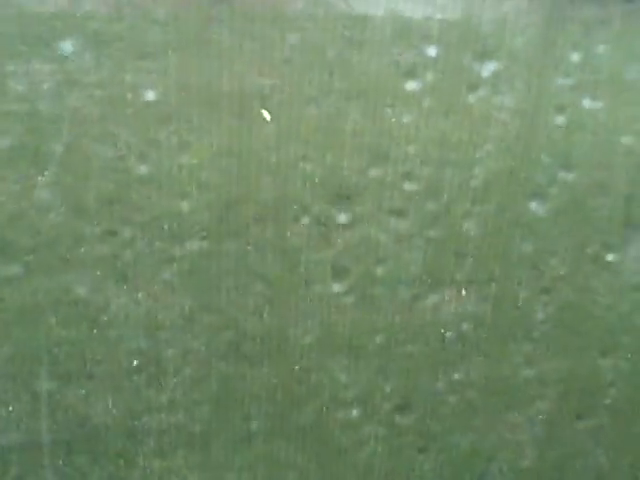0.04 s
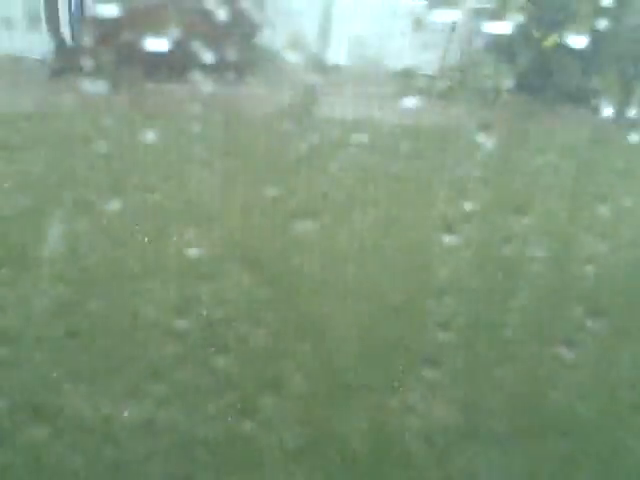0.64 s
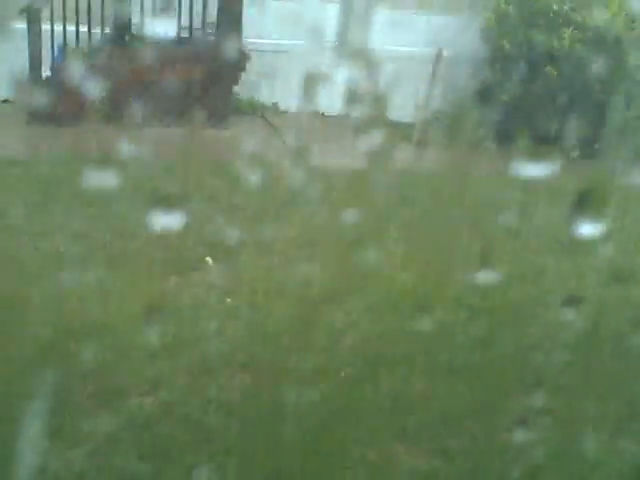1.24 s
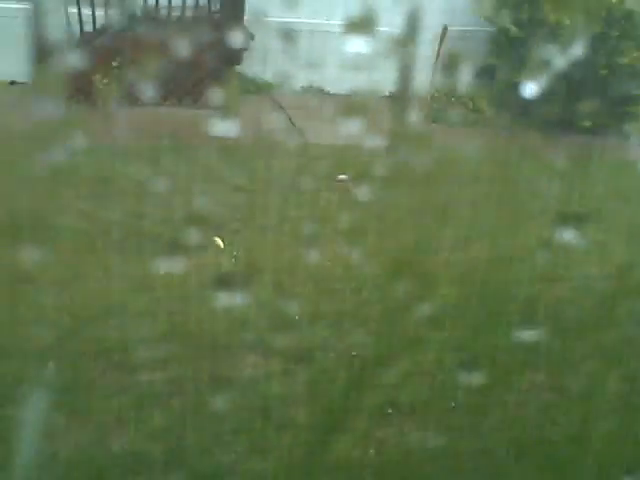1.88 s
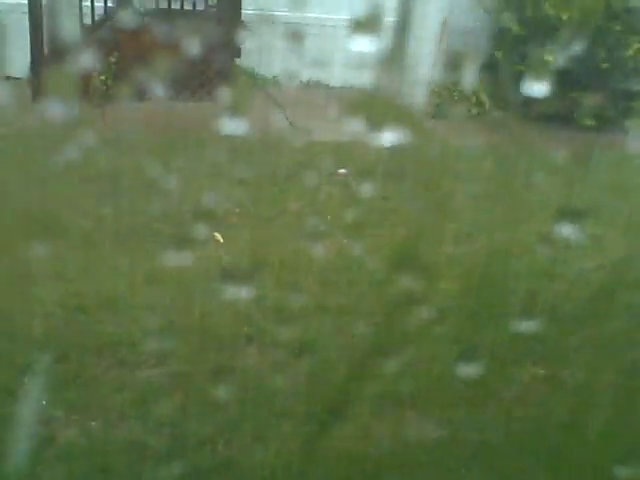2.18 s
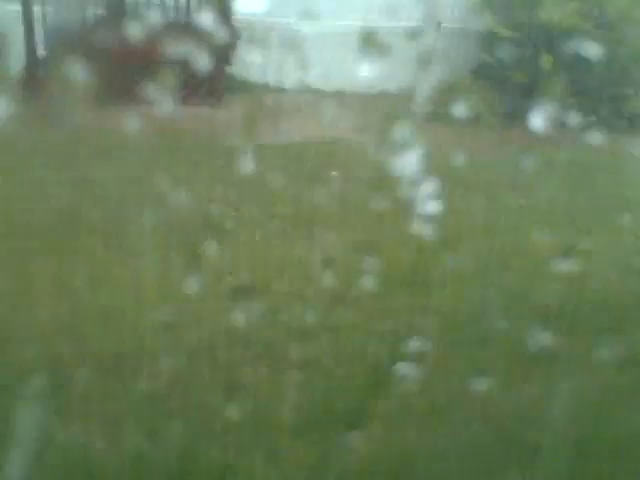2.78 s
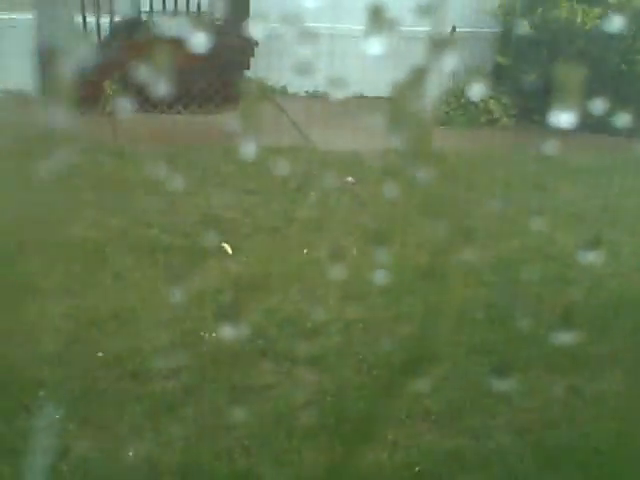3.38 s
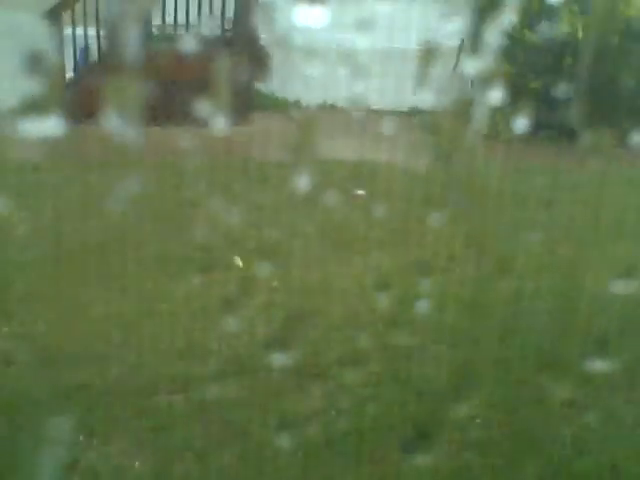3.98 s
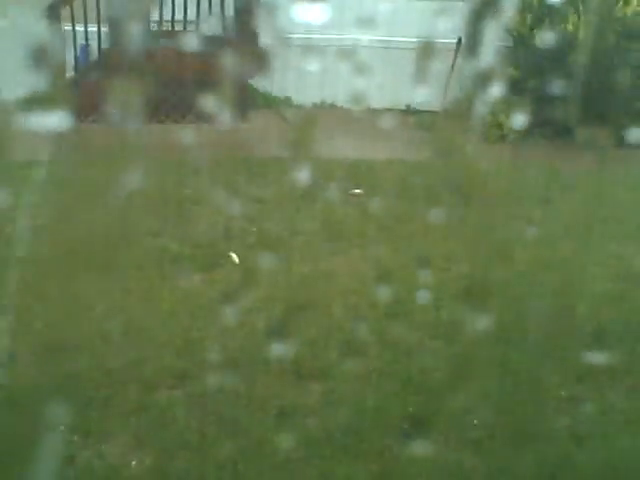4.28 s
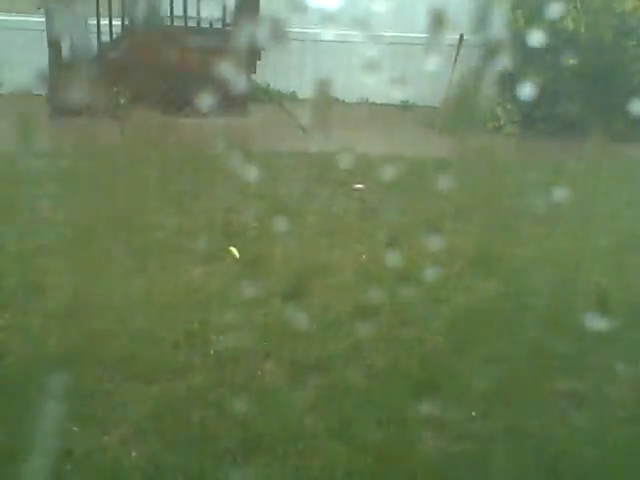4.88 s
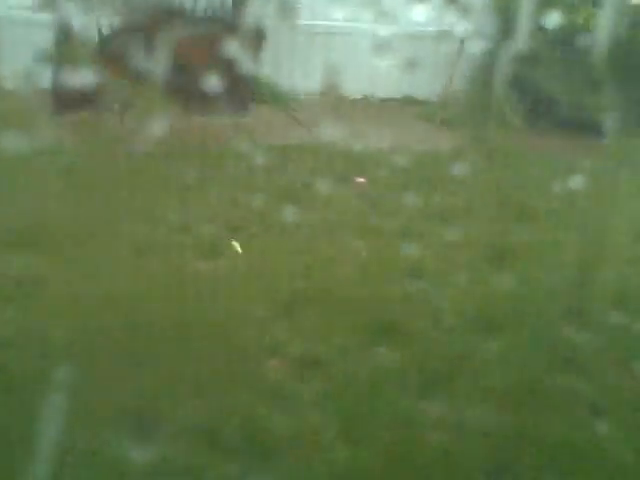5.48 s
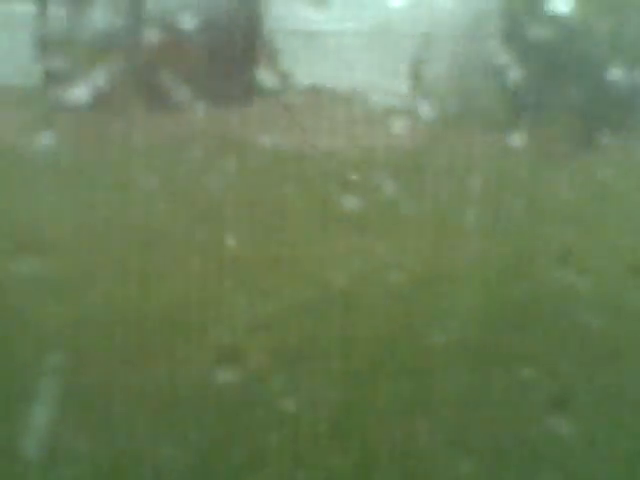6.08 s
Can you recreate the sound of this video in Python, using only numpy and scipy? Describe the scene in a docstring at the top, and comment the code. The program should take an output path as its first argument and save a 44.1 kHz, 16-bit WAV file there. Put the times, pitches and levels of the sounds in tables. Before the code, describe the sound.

Hailstones strike a window in irregular, sharp, bright cracks, each with a short knock and rattle of the glass. The hardest come early, followed by lighter ticks, another cluster, a lull and a final flurry. Dull thuds on the wall and roof and a few faint pings fall between them. Behind it all, patter and hiss swell in gusts over low wind rumble. The small microphone, just behind the pane, overloads on the biggest hits.

```python
"""Just behind a window that looks onto a lawn, during a hailstorm.
Stones shatter on pane and frame, excite the modes of the glass and overload a small microphone.
Others thud on wall and roof or ping on something hard. Countless smaller impacts superpose into a
patter that swells in gusts, over the hiss of the ground and the low rumble of the wind."""
import sys
import numpy as np
from scipy import signal
from scipy.fft import rfft, irfft, next_fast_len
from scipy.io import wavfile
from scipy.ndimage import uniform_filter1d

SR = 44100
rng = np.random.default_rng(int(sys.argv[2]) if len(sys.argv) > 2 else 0)


def log_audio(samples):
    """Write samples as a 16-bit WAV file to the path given in sys.argv[1]."""
    # one column per channel
    frames = np.atleast_2d(samples).T
    # limit to full scale, then quantise
    limited = np.clip(frames, -1, 1)
    pcm = np.round(limited * 32767).astype(np.int16)
    wavfile.write(sys.argv[1], SR, pcm)


N = 275184
TIME = np.arange(N) / SR

# large stones on the window: (time [s], relative crack level [dB], knock level [dB], crack pitch [Hz])
WINDOW_HITS = [(0.0262, 4, -23, 6800), (0.1496, 0.5, -24, 6540), (0.246, -2.5, -23, 5920),
               (0.31, -22, -29.5, 6040), (0.383, -14, -36, 6700), (0.389, -12.5, -36, 7000),
               (0.4454, 7, -19, 6480), (0.539, -18, -41.5, 6200), (0.711, 7.5, -19.5, 6300),
               (0.74, -9, -40, 5970), (0.9671, 9.5, -16.5, 7030), (1.2384, 11.5, -15.5, 6860),
               (1.4476, 3.5, -21, 6000), (2.004, 8, -19.5, 6540), (2.1017, -21, -41, 6350),
               (2.151, -29.5, -46.5, 6340), (2.267, -31.5, -40.5, 6100), (2.3819, -20, -40.5, 6400),
               (2.478, -30, -38, 6100), (2.7918, -24, -35, 6160), (2.9319, -24, -47, 5000),
               (3.048, -29, -34, 5550), (3.1379, 5, -25.5, 6230), (3.2945, 5.5, -26.5, 6260),
               (3.3243, 4.5, -24.5, 6740), (3.416, -20, -29, 6100), (3.4301, 4, -23.5, 6140),
               (3.4666, -14, -30.5, 6500), (3.557, -22.5, -42, 5950), (3.618, -19.5, -43, 5830),
               (4.377, -22.5, -31.5, 4900), (4.634, -9, -30.5, 6750), (4.679, -25.5, -36, 6140),
               (4.762, -25, -34, 5870), (4.852, -27.5, -41.5, 5700), (4.983, -22.5, -50, 6400),
               (5.1633, -21.5, -58, 6530), (5.3019, 5, -23, 6200), (5.347, -20.5, -46, 5830),
               (5.3997, -3, -41, 6400), (5.4356, -15, -52, 4900), (5.5002, -24.5, -32.5, 6540),
               (5.579, -25, -35.5, 6150), (5.646, -20, -37.5, 6440), (5.7557, 0, -27.5, 6950),
               (5.7797, 1.5, -21, 6000), (5.8495, -17.5, -25.5, 6130), (5.951, -1.5, -32, 7100),
               (5.9708, -5.5, -27.5, 6350), (5.9875, 3.5, -22, 6420), (6.099, 6, -22.5, 6760),
               (6.2095, 7, -15, 6100)]
# the storm's hiss, which swells in gusts and briefly ducks away: (time [s], relative level [dB])
HISS_LEVELS = [(0, -31), (.28, -39.5), (.42, -26.5), (.62, -31.5), (.84, -30), (1.18, -34.5), (1.36, -31),
               (1.76, -29.5), (2.13, -47.5), (2.42, -33.5), (2.76, -30), (3.0, -36.5), (3.27, -40.5),
               (3.59, -43), (3.68, -32), (3.9, -31.5), (4.14, -36), (4.46, -47.5), (4.85, -38),
               (5.0, -34.5), (5.1, -36.5), (5.62, -37), (5.84, -24.5), (6.06, -23), (6.24, -26.5)]
# the wind's rumble: (time [s], relative level [dB])
WIND_LEVELS = [(0, -31.5), (0.55, -31.5), (1.15, -42), (1.33, -28.5), (1.8, -39.0), (2.7, -39), (3.5, -32),
               (3.95, -44.5), (4.3, -42.5), (4.8, -33.5), (5.6, -33), (5.85, -30.5), (6.24, -34)]
# rumble of wind and wall: (frequency [Hz], spectral level [dB])
RUMBLE_SPECTRUM = [(10, -4.5), (25, 5), (55, 1), (75, -1.5), (105, 0.5), (145, -5), (200, -13),
                   (400, -41.5)]


def large_stones(crack_trim_db=-2):
    """Superposition: the separate impacts on the window add linearly."""
    out = np.zeros(N)
    for start, crack_db, knock_db, hz in WINDOW_HITS:
        add(out, start, stone(crack_db + crack_trim_db, knock_db, hz))
    return out


def stone(crack_db, knock_db, hz, swing_s=0.00026, far_db=-24):
    """Impact: a near stone cracks at once, a faint far one is smeared; inertia slows the pane's onset."""
    t = TIME[:SR // 3]
    distance = crack_db / far_db  # 0 near, 1 far
    rise_s = np.interp(distance, [0, 1], [0.00039, 0.0012])
    t60 = np.interp(distance, [0, 1], [0.055, 0.068])
    ice = undb(crack_db) * crack(t, hz, t60) * onset(t, rise_s)
    glass = undb(knock_db) * knock(t) * onset(t, rise_s + swing_s)
    return disperse(ice + glass)


def crack(t, hz, t60, ring_width_hz=1100, ring_t60=0.044, room_db=-26, room_t60=0.25):
    """Brittle fracture: ice shatters in a broadband burst with a brief ring and a faint room tail."""
    # shattering ice: (frequency [Hz], spectral level [dB])
    ice_spectrum = [(300, -19), (1500, -13.5), (3000, -10), (4300, -5.5), (6200, 0.5), (7400, -3.5),
                    (8300, -13), (10000, -10.5)]
    burst = unit(ripple(colour(rng.standard_normal(len(t)), ice_spectrum)))
    ring = resonant_noise(len(t), hz, ring_width_hz)
    return burst * (fade(t, t60) + undb(room_db) * fade(t, room_t60)) + ring * fade(t, ring_t60)


def knock(t, modes_db=2, rattle_db=4.5, rattle_t60=0.098, room_db=-20, room_t60=0.066, detuning=0.0074):
    """Modal vibration: the point of impact weights the pane's modes; glass and frame rattle densely."""
    # modes of the pane: (frequency [Hz], relative level [dB], 60 dB decay time [s])
    pane_modes = [(85.4, -0.5, 0.11), (105.4, -6, 0.33), (116, 7.5, 0.15), (139.7, -5, 0.42),
                  (192.7, -5, 0.31), (302.9, -2, 0.27), (485, -9, 0.42), (553, -4, 0.32), (784.3, 1, 0.17),
                  (1050, -14.5, 0.088), (1272, -4.5, 0.13), (1800, -24, 0.067), (1975, -1.5, 0.065),
                  (2500, -7, 0.11), (2880, -11.5, 0.088), (3350, -22, 0.077), (3850, -23, .09),
                  (3660, -5.5, 0.1)]
    # rattle of glass and frame: (frequency [Hz], spectral level [dB])
    rattle_spectrum = [(60, -17), (150, 4.5), (450, 3), (900, 6), (1500, 0.5), (3000, -3.5), (5000, -8.5),
                       (9000, -39)]
    hz, db, mode_t60 = np.transpose(pane_modes)[:, :, None]
    place, detune = rng.standard_normal((2, len(pane_modes), 1))
    weight = np.sign(place) * np.sqrt(abs(place)) * undb(db)
    modes = weight * np.sin(2 * np.pi * hz * (1 + detuning * detune) * t) * fade(t, mode_t60)
    rattle = unit(ripple(colour(rng.standard_normal(len(t)), rattle_spectrum)))
    rattle *= fade(t, rattle_t60) + undb(room_db) * fade(t, room_t60)
    return undb(modes_db) * modes.sum(axis=0) / np.linalg.norm(weight) + undb(rattle_db) * rattle


def ripple(x, spread_db=2.5, step_hz=130):
    """Modal overlap: each struck spot has its own dense resonances, random spectral peaks and dips."""
    f = np.fft.rfftfreq(len(x), 1 / SR)
    heights = rng.standard_normal(512)
    gain_db = spread_db * np.interp(f / step_hz, np.arange(len(heights)), heights)
    return irfft(rfft(x) * undb(gain_db), len(x))


def disperse(x, travel_s=0.0015):
    """Dispersion: the speed of bending waves grows with the root of frequency, so highs arrive first."""
    f = np.fft.rfftfreq(len(x), 1 / SR)
    group_delay = travel_s * np.maximum(np.sqrt(7000 / np.maximum(f, 300)) - 1, 0)
    phase = -2 * np.pi * np.cumsum(group_delay) * f[1]
    return irfft(rfft(x) * np.exp(1j * phase), len(x))


def small_stones(count=18, crack_db=5, knock_db=-7, spread_db=2, hz=6050, scatter_hz=350):
    """Random impacts: a few small stones a second hit the window, their level following the patter's."""
    out, pelting = np.zeros(N), pelting_db()
    moments = (np.arange(count) + rng.random(count)) * N / count
    for i, (size, place, pitch) in zip(moments.astype(int), rng.standard_normal((count, 3))):
        db = pelting[i] + spread_db * size
        add(out, i / SR, stone(db + crack_db, db + knock_db + spread_db * place, hz + scatter_hz * pitch))
    return out


def thuds(relative_width=0.52, rise_s=0.00063):
    """Transmission through a wall: one broad, low resonance gets in; the lower, the longer it rings."""
    # blows on wall and roof: (time [s], pitch [Hz], level [dB])
    blows = [(.328, 460, -24), (.379, 750, -26), (.688, 550, -26), (.718, 101, -19.5), (1.612, 640, -28),
             (1.615, 231, -36), (2.79, 430, -27), (3.684, 770, -32.5), (4.382, 495, -25), (4.388, 122, -24),
             (5.85, 320, -28.5)]
    out, t = np.zeros(N), TIME[:SR // 3]
    for start, hz, db in blows:
        boom = resonant_noise(len(t), hz, relative_width * hz)
        t60 = 0.14 * (400 / hz) ** 0.47
        add(out, start, undb(db) * boom * fade(t, t60) * onset(t, rise_s))
    return out


def pings(t60=0.082, rise_s=0.00057, width_hz=300):
    """Damped resonance: something hard answers a stone with one short, slightly rough ring."""
    # hits on hard objects: (time [s], pitch [Hz], level [dB])
    hard_hits = [(0.39, 7240, -18), (2.587, 1636, -32), (3.522, 2870, -37.5), (4.298, 2454, -37.5)]
    out, t = np.zeros(N), TIME[:SR // 3]
    for start, hz, db in hard_hits:
        ring = resonant_noise(len(t), hz, width_hz)
        add(out, start, undb(db) * ring * fade(t, t60) * onset(t, rise_s))
    return out


def hiss_and_patter(hiss_trim_db=-0.5, patter_trim_db=-5.5, near_db=-5):
    """Incoherent summation: countless far stones merge into a hiss; nearer ones drum on the house."""
    # hail on the ground: (frequency [Hz], spectral level [dB])
    hiss_spectrum = [(1000, -17), (2500, -16), (4000, -14.5), (5200, -6), (6300, -2), (7200, -6.5),
                     (8000, -28), (9000, -11.5)]
    # hail on the house: (frequency [Hz], spectral level [dB])
    patter_spectrum = [(80, -15), (170, -3), (300, 2), (480, -3), (750, -0.5), (1100, -9.5), (2000, -11.5),
                       (3500, -22), (7000, -15.5)]
    surge_db = -0.5 * drift(rate_hz=9)
    near = undb(near_db) * shower(per_s=80, spread_db=3, t60=0.086)
    hiss = colour(shower(per_s=1500, spread_db=0.5, t60=0.015) + near, hiss_spectrum)
    patter = colour(shower(per_s=390, spread_db=5.5, t60=0.14) + near, patter_spectrum)
    hiss *= undb(curve(HISS_LEVELS) + surge_db + hiss_trim_db)
    patter *= undb(pelting_db() + surge_db + patter_trim_db)
    return hiss + patter


def shower(per_s, spread_db, t60, rise_s=0.0013):
    """Shot noise: random impacts of unequal size, each a soft-edged splat, add in power."""
    impacts = rng.random(N) < per_s / SR
    size = undb(spread_db * np.minimum(rng.exponential(size=N), 3))
    power = signal.lfilter([1], [1, -fade(1 / SR, t60) ** 2], impacts * size ** 2)
    power = signal.lfilter([1], [1, -np.exp(-1 / (rise_s * SR))], power)
    return unit(np.sqrt(power) * rng.standard_normal(N))


def pelting_db(wind_share=0.47):
    """Weighted mean: the level of hail on the house follows both the hiss and the driving wind."""
    return (1 - wind_share) * curve(HISS_LEVELS) + wind_share * curve(WIND_LEVELS)


def wind(trim_db=-2):
    """Turbulence: low-frequency noise swells with each gust and flutters slightly."""
    rumble = colour(rng.standard_normal(N), RUMBLE_SPECTRUM)
    flutter_db = -0.9 * drift(rate_hz=7.7)
    return rumble * undb(curve(WIND_LEVELS) + flutter_db + trim_db)


def microphone_thumps():
    """Transients: low thumps as the microphone overloads on the two hardest hits, and one wind buffet."""
    # tapered sine pulses: (time [s], frequency [Hz], duration [s], peak level [dB])
    pulses = [(0.96, 30, 0.071, -16.5), (1.234, 31, 0.034, -15), (5.317, 21.54, 0.21, -16)]
    out = np.zeros(N)
    for start, hz, duration, db in pulses:
        t = TIME[:int(duration * SR)]
        add(out, start, -undb(db) * np.sin(2 * np.pi * hz * t) * signal.windows.tukey(len(t)))
    return out


def wall(coupling_db=-12, t60=0.75, rise_s=0.013):
    """Structure-borne sound: each large stone's knock shakes the wall, which rumbles on for a moment."""
    power, t = np.zeros(N), TIME[:SR]
    for start, _, knock_db, _ in WINDOW_HITS:
        amplitude = undb(knock_db + coupling_db) * fade(t, t60) * onset(t, rise_s)
        add(power, start, amplitude ** 2)
    return np.sqrt(power) * colour(rng.standard_normal(N), RUMBLE_SPECTRUM)


def undb(db):
    """Decibels to amplitude ratio."""
    return 10 ** (np.asarray(db) / 20)


def unit(x):
    """Normalisation to rms 1."""
    return x / np.sqrt(np.mean(x ** 2))


def onset(t, rise_s):
    """Exponential rise with time constant rise_s."""
    return 1 - np.exp(-t / rise_s)


def fade(t, t60):
    """Exponential decay, 60 dB down after t60."""
    return np.exp(-np.log(1000) * t / t60)


def add(out, start_s, x):
    """Superposition of x on out from start_s."""
    i = int(start_s * SR)
    out[i:i + len(x)] += x[:max(len(out) - i, 0)]


def curve(points):
    """Linear interpolation of (time [s], level [dB]) points."""
    return np.interp(TIME, *np.transpose(points))


def drift(rate_hz):
    """Slow random fluctuation of rms 1."""
    hold = int(SR / rate_hz)
    steps = np.repeat(rng.standard_normal(N // hold + 1), hold)
    return unit(uniform_filter1d(steps, hold)[:N])


def colour(x, points):
    """Spectral shaping by (frequency [Hz], level [dB]) points, to rms 1."""
    hz, db = np.transpose(points)
    size = next_fast_len(len(x))
    f = np.maximum(np.fft.rfftfreq(size, 1 / SR), 1)
    gain = undb(np.interp(np.log(f), np.log(hz), db))
    return unit(irfft(rfft(x, size) * gain, size)[:len(x)])


def resonant_noise(samples, hz, width_hz):
    """Resonance: white noise through two resonators in series, each width_hz wide; rms 1."""
    b, a = signal.iirpeak(hz, hz / width_hz, fs=SR)
    once = signal.lfilter(b, a, rng.standard_normal(samples))
    return unit(signal.lfilter(b, a, once))


def low_pass(x, hz):
    """Steep zero-phase low-pass filtering."""
    taps = signal.firwin(101, hz, fs=SR, window=("kaiser", 8))
    return signal.fftconvolve(x, taps[None], "same")


def scene():
    """Superposition of window and storm in one channel."""
    impacts = large_stones() + thuds() + pings()
    storm = hiss_and_patter() + wind()
    return (impacts + storm + microphone_thumps() + small_stones() + wall())[None]


def record(dry, input_limit=0.86, output_limit=0.68, band_hz=8300, top_hz=15800):
    """Saturation: the microphone overloads on near stones; its narrow band is clipped again on output."""
    saturated = dry / (1 + (dry / input_limit) ** 4) ** (1 / 4)
    clipped = np.clip(low_pass(saturated, band_hz), -output_limit, output_limit)
    return low_pass(clipped, top_hz)


dry = scene()
out = record(dry)
log_audio(out)
```